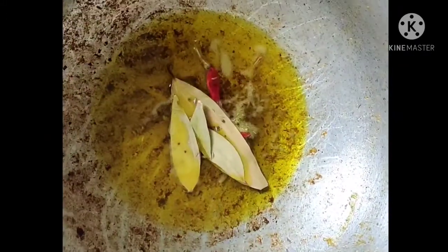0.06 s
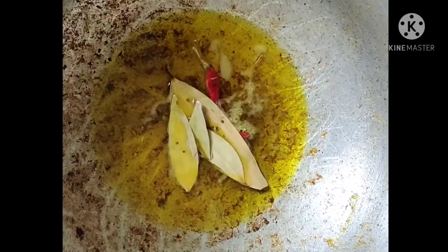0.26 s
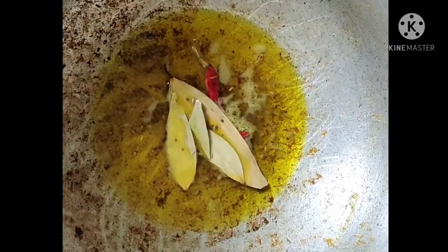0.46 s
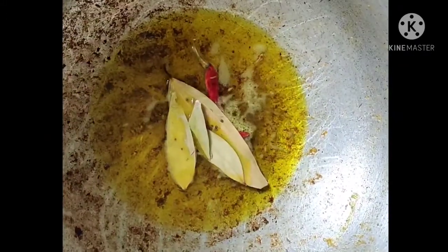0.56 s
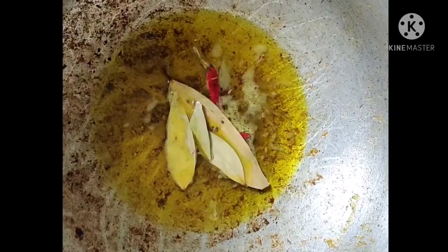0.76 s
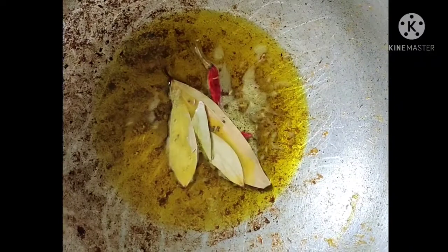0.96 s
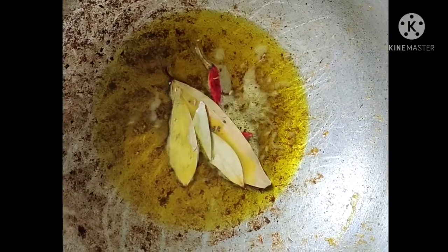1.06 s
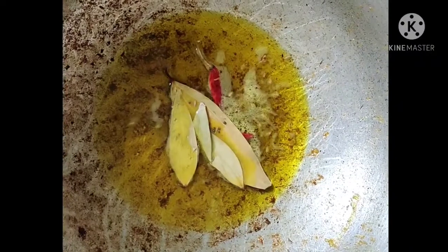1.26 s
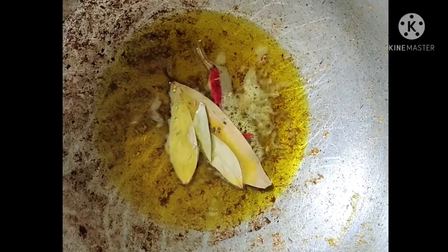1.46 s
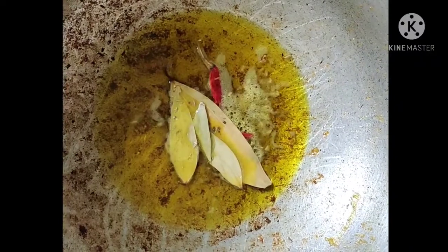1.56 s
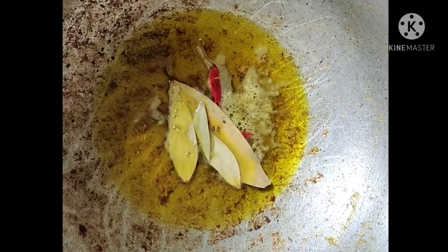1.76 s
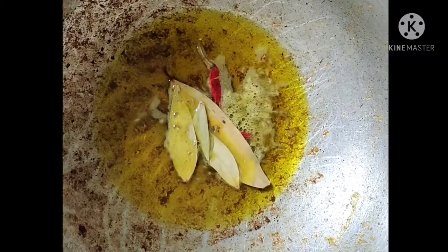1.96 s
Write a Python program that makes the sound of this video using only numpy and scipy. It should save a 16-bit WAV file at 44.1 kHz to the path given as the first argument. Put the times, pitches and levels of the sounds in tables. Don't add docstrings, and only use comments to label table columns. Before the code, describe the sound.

Close-up frying in a metal pan: irregular pops in tight clusters, tiny ticks and spitting droplets, a thin constant sizzle beneath, faint low flame rumble, short bowl-like echoes, indoors, near stereo microphones.

```python
import sys
import numpy as np
from scipy import signal
from scipy.fft import irfft
from scipy.io import wavfile
from scipy.ndimage import uniform_filter1d

SR = 44100
rng = np.random.default_rng(int(sys.argv[2]) if len(sys.argv) > 2 else 0)


def level_to_linear(level):
    exponent = np.asarray(level, float) / 20
    return 10 ** exponent


def to_wav(s):
    ch = np.atleast_2d(s).T
    pcm = np.round(np.clip(ch, -1, 1) * 32767)
    wavfile.write(sys.argv[1], SR, pcm.astype(np.int16))


N = 88200

# pitch in Hz, level in dB per Hz.
HUM_COLOUR = [(15, -49), (25, -14), (51, 0), (81, -0.5), (184, -8), (241, 0), (533, -10.5), (687, -6.5),
              (900, -18), (1170, -33), (1980, -120)]
# pitch in Hz, width in Hz, level in dB.
DRONES = [(77.5, 15.4, -63.5), (112.5, 4.1, -71), (149.7, 39, -69), (231.4, 24, -72.5), (375, 87, -77.5)]
# pitch in Hz, likeness from 0 to 1.
HUM_LIKENESS = [(60, 0.97), (150, 0.86), (400, 0.96), (900, 0.97)]
# pitch in Hz, level in dB.
FIZZ_COLOUR = [(1000, -1.5), (4000, -4), (8000, -5), (16000, 1.5)]
# time in seconds, level in dB.
OIL_HEAT = [(0.0, -51), (0.85, -52), (2.0, -51)]
# time of the peak in seconds, peak in dB, bubble radius in mm, swelling in cycles, ring
# and echo in dB.
POPS = [(0.2128, -17, 1.73, 1.56, 0.5), (0.2192, -15.5, 1.93, 1.535, -11),
        (0.2216, -10.5, 1.17, 1.05, -11.5), (0.224, -12.5, 1.86, 1.54, -18), (0.292, -9, 1.35, 0.99, -11.5),
        (0.3818, -15, 1.46, 1.26, -14), (0.3882, -13, 1.32, 1.38, -21), (0.4789, -20.5, 1.03, 1.42, -17),
        (0.5572, -9.5, 1.62, 1.19, -15.5), (0.5597, -27.5, 1.92, 1.48, -1.5), (0.5755, -8, 1.23, 0.91, -10),
        (0.8388, -16, 1.85, 1.34, -10.5), (0.8418, -14.5, 1.51, 1.27, -6.5), (0.9325, -19, 1.92, 0.91, -12),
        (1.0854, -15, 1.09, 2.35, -13), (1.095, -5, 1.583, 1.31, -8), (1.12, -20.5, 1.8, 1.5, -28),
        (1.1708, -7.5, 1.154, 1.52, -13.5), (1.2442, -10, 1.13, 1.43, -16), (1.422, -15.5, 1.41, 1.25, -44),
        (1.6439, -11.5, 1.8, 1.65, -11.5), (1.6515, -21.5, 1.65, 1.44, -4.5), (1.6771, -16, 1.21, 1.84, -7),
        (1.7144, -27, 1.87, 1.4, -10.5)]
# time of the peak in seconds, peak in dB, bubble radius in mm, swelling in cycles.
CRACKLES = [(0.0446, -24, 1.39, 0.82), (0.076, -32.5, 1.9, 1.26), (0.098, -22, 1.18, 1.08),
            (0.1237, -29, 5.1, 0.68), (0.1242, -27, 1.47, 1.7), (0.26, -20, 1.12, 0.88),
            (0.2684, -21, 1.47, 0.79), (0.317, -25, 1.59, 1.45), (0.3235, -29, 1, 1.34),
            (0.3816, -38.5, 5.15, 1.1), (0.39, -24.5, 1.53, 1.7), (0.4652, -20, 1.2, 1.16),
            (0.553, -26, 1.5, 0.59), (0.557, -31.5, 5.6, 0.47), (0.7285, -27, 1.42, 1.6),
            (0.7523, -20.5, 1.16, 1.15), (1.0939, -14, 1.105, 1.8), (1.7846, -27, 1.13, 1.6),
            (1.839, -18.5, 0.89, 1.01), (1.959, -29.5, 1.19, 2.5), (1.9771, -20.5, 1.385, 1.34),
            (0.8386, -34, 4, 0.56), (1.115, -38, 5.9, 0.59)]
# time of the peak in seconds, peak in dB, bubble radius in mm.
TICKS = [(0.069, -29.5, 1.46), (0.085, -30, 1.36), (0.109, -32, 1.1), (0.1143, -33, 1.4),
         (0.1345, -36, 1.03), (0.164, -31.5, 1.54), (0.198, -25.5, 1.1), (0.273, -34, 0.6),
         (0.28, -39, 1.9), (0.429, -34, 1.39), (0.4948, -28, 1.28), (0.7185, -33, 1.05),
         (0.988, -30.5, 1.2), (1.147, -40, 1.88), (1.424, -32, 1.64), (1.4061, -39, 1.25),
         (1.7648, -36.5, 1), (0.437, -37, 1.36), (0.506, -36, 1.2)]
# time of the peak in seconds, peak in dB, bubble radius in mm.
SPITS = [(0.478, -31, 0.3), (0.5112, -24.5, 0.24), (0.6183, -35, 0.32), (0.6724, -27, 0.21),
         (0.8723, -25.5, 0.27), (1.0924, -43, 0.36), (1.171, -30, 0.16), (1.2438, -28.5, 0.3),
         (1.647, -32, 0.45), (1.6789, -30, 0.52), (1.7648, -30, 0.51), (1.785, -30.5, 0.53),
         (1.8398, -32, 0.55), (1.9663, -29, 0.65), (1.9781, -56, 0.17)]
# time of the peak in seconds,
# peak in dB, bubble radius in mm, swelling in cycles.
AFTER_BURSTS = [(0.0771, -37, 2.7, 0.57), (0.108, -25, 1.7, 1.4), (0.1243, -35, 2.8, 0.63),
                (0.2158, -13, 1.35, 1.5), (0.2178, -19, 2.07, 1.48), (0.2186, -33, 5.4, 0.66),
                (0.2262, -18, 1.3, 1.5), (0.2921, -31, 0.87, 2.4), (0.2955, -30, 1.2, 1.34),
                (0.3231, -32, 0.44, 1.2), (0.3885, -33, 0.97, 2.1), (0.4673, -21, 0.62, 2.1),
                (0.4783, -28, 0.76, 2.3), (0.558, -46, 0.38, 0.9), (0.5737, -19, 0.71, 2.08),
                (0.751, -44, 0.43, 2.3), (0.8383, -41, 0.39, 0.9), (0.8388, -28, 3.3, 0.54),
                (0.8442, -28, 2.23, 2.38), (0.8598, -36, 2.3, 1.8), (0.9325, -35.5, 3.7, 0.54),
                (0.9584, -39, 0.23, 1.2), (1.0383, -38, 0.2, 1.2), (1.0845, -22.5, 0.67, 3.9),
                (1.0856, -35, 0.36, 1.1), (1.0891, -14, 0.75, 2.5), (1.0918, -32, 1.8, 1.25),
                (1.0951, -33, 2.8, 0.62), (1.0965, -23.5, 1.35, 0.97), (1.0992, -26, 2.1, 1.37),
                (1.1045, -29, 1.7, 1.44), (1.1205, -29, 1.1, 1.5), (1.17, -33, 0.86, 1.74),
                (1.1756, -25, 1, 1.6), (0.94, -30, 1.2, 1.3), (1.2007, -40, 0.45, 1.8),
                (1.2449, -19, 0.78, 2), (1.4217, -28, 0.77, 1.7), (1.6434, -33, 2.6, 0.62),
                (1.6452, -13.5, 1.12, 1.64), (1.7144, -30.5, 2.55, 0.65), (1.7834, -33, 0.38, 0.8),
                (1.6, -30, 0.6, 1.8)]
# start in seconds, peak in dB.
SEED_PINGS = [
    (1.783, -36),
    (1.788, -41),
    (1.838, -44),
]
# pitch in Hz, level in dB, time to fall 60 dB in seconds.
RIM_TONES = [(6380, -3, 0.057), (6990, -2, 0.049), (7350, -4, 0.058), (7850, -5, .03), (8600, -5, .03)]
# pitch in Hz, level in dB, time to fall 60 dB in seconds.
PAN_TONES = [(1466, 8, 0.016), (1605.5, -3.5, 0.072), (1753, -9.5, 0.05), (1993, -2, 0.039),
             (2228, -17, 0.042), (2316, -10, 0.018), (2482, -4, 0.023), (2665, -0.5, 0.02),
             (2748, -5, 0.01), (2980, -4.5, 0.014), (3302, -6.5, 0.037), (3983, -2.5, .025)]
# pitch in Hz, level in dB, time to fall 60 dB in seconds.
HOLLOW_TONES = [(1621, -9, 0.016), (2030, -6, 0.037), (1660, -24, 0.14)]
# pitch in Hz, time to fall 60 dB in seconds.
BOWL_DECAY = [(500, 0.1), (2000, 0.12), (8000, 0.11)]
# pitch in Hz, time to fall 60 dB in seconds.
KITCHEN_DECAY = [(500, 0.98), (2000, 0.32), (8000, 0.13)]
# pitch in Hz, level in dB.
LEFT_PORT = [(1150, -9), (1620, -3.5), (1850, -7), (2280, 0.5), (2750, 2.5), (3400, -5), (7200, -4),
             (15500, -11)]
# pitch in Hz, level in dB.
RIGHT_PORT = [(1150, -10), (1650, -12.5), (2000, -20.5), (3400, -14.5), (4000, -8.5), (7000, -14.5),
              (8800, -4.5), (15000, -24.5)]
# pitch in Hz, level in dB.
PORT_NOTCH = [(4200, 0.5), (4700, -2), (5100, -6.5), (5450, -8), (5700, -13), (6000, -9.5), (6500, -3.5),
              (7100, 2)]

BUBBLE_HZ_MM = 3487
SPOTS = 4


def evened(x):
    return x / np.sqrt(np.mean(x ** 2) + 1e-20)


def read(points, hz):
    f, value = np.transpose(points)
    return np.interp(np.log(hz + 1), np.log(f + 1), value)


def add(mix, s, sound):
    part = mix[round(s * SR):][:len(sound)]
    part += sound[:len(part)]


def colour(x, *tables):
    causal_share = 0.62
    hz = abs(np.fft.fftfreq(4096, 1 / SR))
    log_gain = sum(read(p, hz) for p in tables) * np.log(10) / 20
    phase = -causal_share * signal.hilbert(log_gain).imag
    taps = np.fft.ifft(np.exp(log_gain + 1j * phase)).real
    return signal.oaconvolve(x, np.fft.fftshift(taps))[2048:N + 2048]


def ring(x, modes):
    detune = 0.02
    t = np.arange(SR // 4) / SR
    chance = rng.uniform(-0.43, 1, (2, len(modes), 3))
    body = np.zeros((2, len(t)))
    for port in range(2):
        for (hz, db, t60), (stronger, sharper, turn) in zip(modes, chance[port]):
            fade = level_to_linear(db + 3.9 * stronger - 60 * t / t60)
            body[port] += fade * np.sin(2 * np.pi * hz * (1 + detune * sharper) * t + np.pi * turn)
    body *= np.minimum(t / 0.0006, 1)
    return signal.fftconvolve(x[None], body / np.linalg.norm(body[0]), axes=1)[:, :N]


def echoes(x, decays, first):
    taps = np.zeros((2, SR // 2))
    at = np.arange(first, SR // 2 - 20, 20)
    at = at + rng.integers(0, 20, (2, len(at)))
    np.put_along_axis(taps, at, rng.choice([-1., 1.], at.shape), 1)
    hz, t, z = signal.stft(taps, SR, nperseg=128)
    fade = level_to_linear(-60 * t / read(decays, hz)[:, None])
    tail = signal.istft(z * fade, SR, nperseg=128)[1]
    return signal.fftconvolve(x[None], tail / np.linalg.norm(tail[0]), axes=1)[:, :N]


def bubble(radius_mm, cycles):
    glide, steepness, push_db = 0.002, 4.3, -25
    hz = BUBBLE_HZ_MM / radius_mm
    turns = hz * np.arange(600) / SR
    age = turns / max(cycles, .2)
    swell = (age * np.exp(1 - age)) ** steepness
    wave = np.sin(2 * np.pi * (turns + glide * turns ** 2 / 2))
    tone = swell * (wave - level_to_linear(push_db))
    return tone / abs(tone).max() / level_to_linear(read(LEFT_PORT, hz))


def hum():
    hum_db = -64.5
    hz = np.fft.rfftfreq(N, 1 / SR)
    a, b, c, d = rng.standard_normal((len(hz), 4)).T
    same = np.clip(read(HUM_LIKENESS, hz), -1, 1)
    left = a + 1j * b
    z = np.array([left, same * left + np.sqrt(1 - same ** 2) * (c + 1j * d)])
    treble_loss = 10 * np.maximum(np.log2(hz / 900 + 1e-9), 0)
    bed = level_to_linear(hum_db) * evened(irfft(z * level_to_linear(read(HUM_COLOUR, hz) - treble_loss), N))
    for f, width, db in DRONES:
        peak = 1 / (1 + (2 * (hz - f) / width) ** 2)
        bed = bed + level_to_linear(db) * evened(irfft(z * peak, N))
    return bed


def fizz():
    fizz_db, hiss_db, bubbles_per_s = -45, -41.5, 1600
    spread_db, top = 3, 2.8
    loudness = level_to_linear(spread_db * np.minimum(rng.exponential(1, N), top))
    bursts = loudness * (rng.random(N) < bubbles_per_s / SR)
    kind = rng.integers(0, 40, N)
    near = np.zeros((2, N))
    for k, mm in enumerate(np.geomspace(.22, 2.4, 40)):
        grain = bubble(mm, 1.28) * level_to_linear(read(LEFT_PORT, BUBBLE_HZ_MM / mm))
        one = signal.oaconvolve(bursts * (kind == k), grain / mm)[:N]
        near += [one, np.roll(one, rng.integers(-8, 9))]
    near = level_to_linear(fizz_db) * evened(near)
    both = near + level_to_linear(-0.5) * echoes(near[0], BOWL_DECAY, first=90)
    both = both + level_to_linear(hiss_db) * rng.standard_normal((2, N))
    t, db = np.transpose(OIL_HEAT)
    heat = level_to_linear(1.55 * (np.interp(np.arange(N) / SR, t, db) - db.mean()))
    return heat * np.array([colour(c, FIZZ_COLOUR) for c in both])


def spray():
    spray_db, fade_s, low_cut_hz = -24, 0.0075, 3080
    t, effort = np.arange(1500) / SR, np.zeros(N)
    for s, db, mm, *rest in POPS + CRACKLES:
        add(effort, s - .0006, level_to_linear(db + spray_db) / mm ** 1.07 * np.exp(-t / fade_s))
    graininess = level_to_linear(0.57 * uniform_filter1d(rng.standard_normal(N), 30))
    drops = rng.standard_normal((2, N)) * graininess
    return signal.sosfilt(signal.butter(2, low_cut_hz, "high", fs=SR, output="sos"), effort * drops)


def pops():
    lead_s, usual_cycles = .0001, 1.3
    ring_db, after_ring_db, bowl_db, kitchen_db = -7.5, -10.5, -1, -12
    direct, struck = np.zeros((2, SPOTS, N))
    rim = np.zeros(N)
    bursts = POPS + [(*row, ring_db) for row in CRACKLES]
    bursts += [(*row, usual_cycles, ring_db) for row in TICKS + SPITS]
    bursts += [(*row, after_ring_db) for row in AFTER_BURSTS]
    for k, (s, db, mm, cycles, strike_db) in enumerate(bursts):
        start = s - lead_s - cycles * mm / BUBBLE_HZ_MM
        add(direct[k % SPOTS], start, level_to_linear(db) * bubble(mm, cycles))
        add(struck[k % SPOTS], start, level_to_linear(db + strike_db) * bubble(mm, cycles))
    for s, db in SEED_PINGS:
        add(rim, s, level_to_linear(db + 28.5) * np.ones(1))
    near = np.zeros((2, N))
    for burst, hit in zip(direct, struck):
        near += burst + ring(hit, PAN_TONES) + level_to_linear(bowl_db) * echoes(hit, BOWL_DECAY, first=90)
    hollow = level_to_linear(-6.0) * ring(direct.sum(0), HOLLOW_TONES) * [[0], [1]]
    pings = ring(rim, RIM_TONES) * level_to_linear([[0], [-6]])
    room = level_to_linear(kitchen_db) * echoes(struck.sum(0), KITCHEN_DECAY, first=400)
    return near + hollow + pings + room


def scene():
    left_lag_s = .00011
    low_cut = signal.butter(2, 330, "high", fs=SR, output="sos")
    left, right = signal.sosfilt(low_cut, pops()) + spray() + fizz()
    left = np.roll(left, round(left_lag_s * SR))
    ports = np.array([colour(left, LEFT_PORT, PORT_NOTCH), colour(right, RIGHT_PORT, PORT_NOTCH)])
    return ports + hum()


def band_limit(x):
    return signal.sosfilt(signal.butter(12, 15950, fs=SR, output="sos"), x)


def record(dry):
    cut = signal.sosfilt(signal.butter(4, 50, "high", fs=SR, output="sos"), dry)
    treble_cut = signal.firwin(255, 15650, window=("kaiser", 6), fs=SR)
    mix = signal.oaconvolve(cut, treble_cut[None], "same")
    return band_limit(mix)


dry = scene()
out = record(dry)
to_wav(out)
```